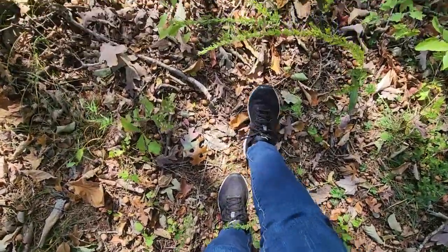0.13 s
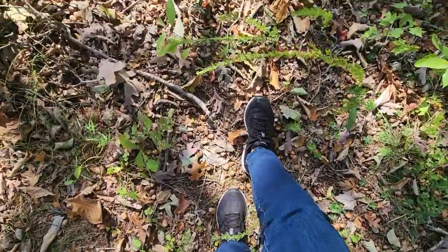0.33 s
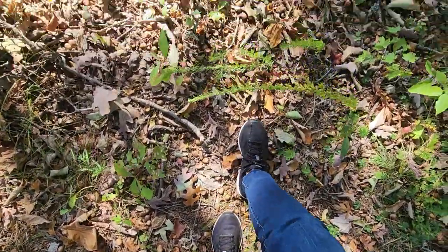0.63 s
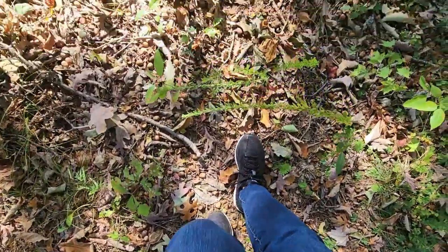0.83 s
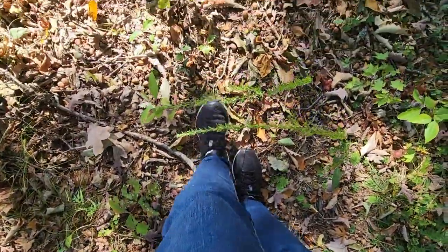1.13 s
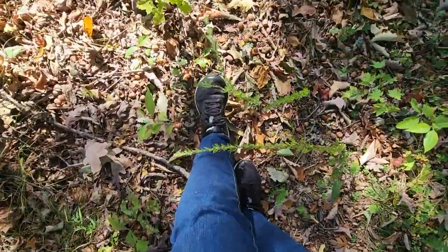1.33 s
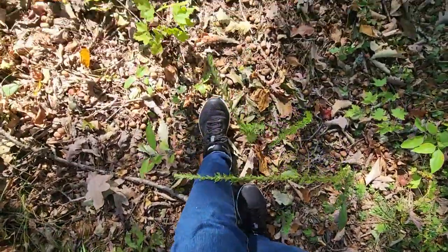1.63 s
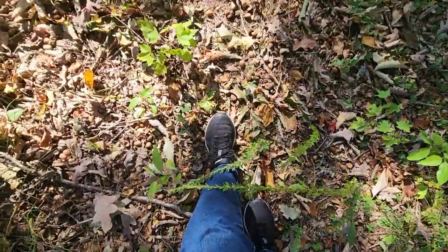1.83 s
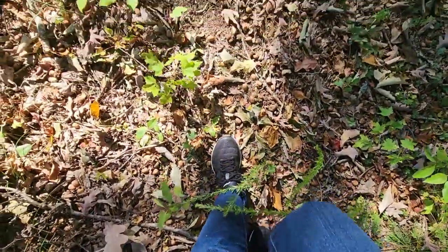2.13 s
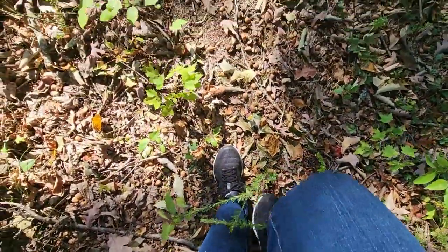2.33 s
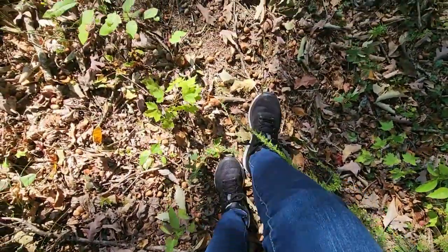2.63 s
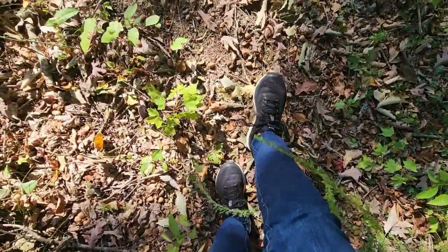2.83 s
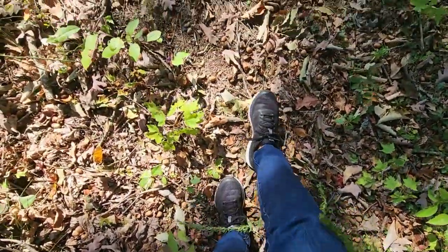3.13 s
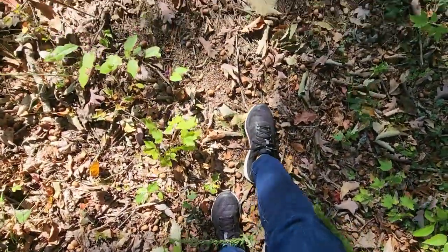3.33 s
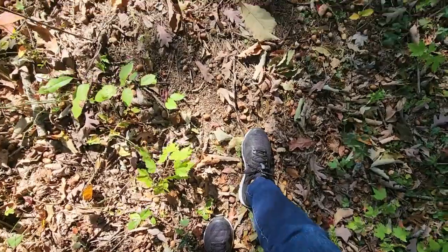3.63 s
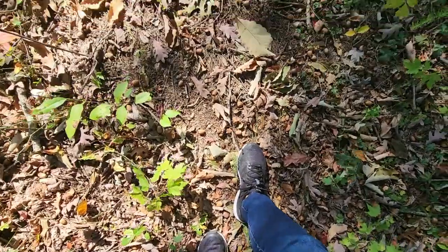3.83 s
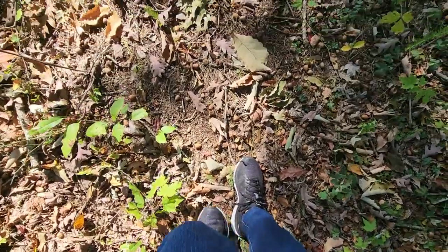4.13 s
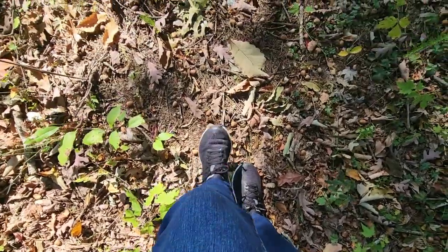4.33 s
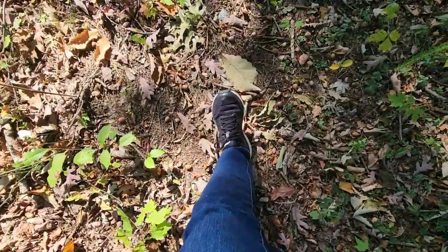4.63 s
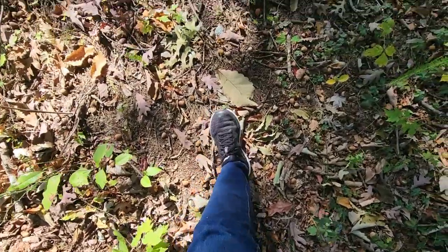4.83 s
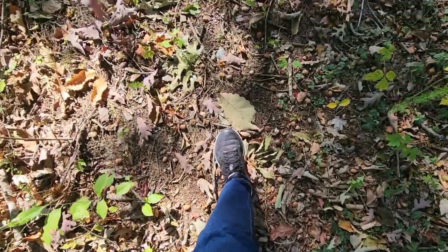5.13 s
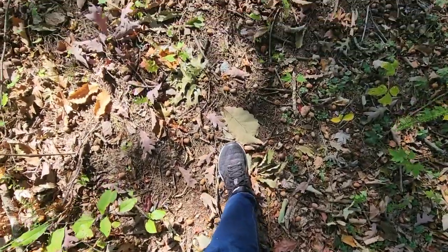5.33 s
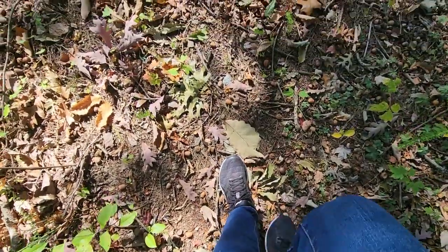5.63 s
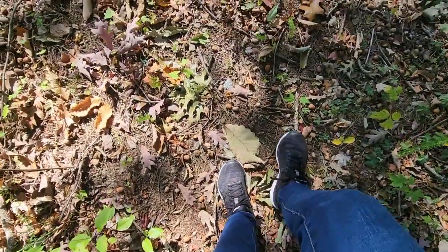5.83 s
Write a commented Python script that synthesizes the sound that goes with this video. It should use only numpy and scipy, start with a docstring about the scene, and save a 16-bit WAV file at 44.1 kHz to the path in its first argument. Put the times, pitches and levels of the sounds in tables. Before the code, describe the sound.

Someone in sneakers walks slowly on leaf litter outdoors, each step a crisp crackling burst that thins out before the next.

```python
"""Dry leaves and twigs crack and crackle under slow footsteps on a forest floor.
Each crack is a burst of noise, mostly a millisecond or two long. Loud ones are listed one by one;
thousands of small ones follow the weight on the foot. A few dull thuds and soft scrapes join them.
A low rumble, light wind and a faint hush lie underneath. The camera body cuts a deep notch in the cracks."""
import sys
import numpy as np
from scipy import signal
from scipy.fft import rfft, irfft
from scipy.io import wavfile
from scipy.ndimage import uniform_filter1d

SR = 44100
rng = np.random.default_rng(int(sys.argv[2]) if len(sys.argv) > 2 else 0)


def waveform_to_disk(signal):
    """Save audio, clipped to [-1, 1], as 16-bit WAV at the path in sys.argv[1]."""
    frames = np.transpose(np.atleast_2d(signal))
    scaled = np.clip(frames, -1, 1) * 32767
    samples = np.round(scaled).astype(np.int16)
    wavfile.write(sys.argv[1], SR, samples)


N = 263277  # length of the scene in samples
EDGE_HZ = 15760  # nothing is kept above about this pitch
SIZE, LEAD = 1024, 128  # samples in a burst, and samples before its listed moment
HZ = np.fft.rfftfreq(SIZE, 1 / SR)

# Loud cracks of twigs and stiff leaves. Each row: moment in seconds, body pitch in Hz, body level in dB,
# crisp level (about 3-6 kHz) in dB, fizz level (about 7 kHz up) in dB, left-right tilt in dB, decay in ms.
# The levels give the energy of both channels together, as if spread over 1 ms.
LOUD_CRACKS = [(0.0549, 1400, -38, -30, -38, 1, 0.35), (0.14, 1570, -45, -47, -22, 0, 1.2),
               (0.198, 1370, -35, -32, -39, 2, 0.85), (0.2043, 1550, -37, -27, -43, -2, 0.32),
               (0.2137, 855, -34, -34, -44, -2, 0.24), (0.244, 1880, -53, -28.5, -41, -6, 0.57),
               (0.2682, 2060, -27, -24, -37, -1, 0.85), (0.2747, 2240, -24, -22, -32, -5, 0.2),
               (0.2794, 770, -24.5, -20, -37, 1, 0.21), (0.288, 2010, -40, -21, -30, 3, 0.84),
               (0.3017, 2140, -33, -27, -26, 1, 1.6), (0.317, 1640, -42, -36, -20, 6, 0.42),
               (0.342, 1410, -39, -30, -18.5, 1, 0.74), (0.3722, 740, -55, -36, -11.5, -2, 0.49),
               (0.4038, 1130, -15.5, -20.5, -19.5, -1, 0.35), (0.4943, 1970, -61, -39, -38, 1, 0.39),
               (0.5134, 950, -37, -29, -52, -4, 0.16), (0.5199, 1890, -31.5, -33, -48, -2, 0.29),
               (0.6018, 1460, -42.5, -38, -47, -1, 0.79), (0.654, 1240, -35, -38, -46.5, 1, 0.3),
               (0.6631, 1920, -71, -51, -31, -4, 0.3), (0.773, 2030, -39.5, -49, -52, -3, 0.56),
               (0.7995, 1750, -36, -52, -34, 4, 0.33), (0.8177, 990, -28.5, -31.5, -36, 5, 0.31),
               (0.8468, 1840, -59, -44, -30, 0, 0.53), (1.0128, 2020, -37, -40, -37, -1, 4.2),
               (1.1107, 1390, -28, -30, -47, -1, 0.81), (1.1303, 1410, -25.5, -30, -30, -7, 3.5),
               (1.139, 1500, -34, -32, -27, 4, 0.83), (1.1696, 1790, -37, -34, -45, -6, 0.21),
               (1.156, 1600, -36, -40, -36, -4, 0.6), (1.191, 1850, -45, -32, -51, 0, 0.46),
               (1.3393, 2100, -41, -33, -39, 1, 0.5), (1.367, 2220, -60, -37, -48, 0, 0.4),
               (1.3872, 2240, -29.5, -28, -22, 10, 1.3), (1.3918, 1060, -32.5, -23, -24, -2, 0.78),
               (1.447, 1310, -47, -31, -22, -1, 0.28), (1.457, 1400, -37, -25, -22, 5, 0.61),
               (1.4643, 1360, -53, -26.5, -21, 9, 0.62), (1.4986, 1340, -55, -31, -18.5, 0, 0.39),
               (1.5077, 770, -41, -35, -30, 1, 1), (1.5736, 1780, -26, -22, -33, -3, 0.25),
               (1.6398, 1460, -60, -49, -17.5, 0, 0.3), (1.6565, 1440, -25.5, -20.5, -18, -2, 4.7),
               (1.7142, 704, -28.5, -52, -26, -1, 1.8), (1.769, 716, -32.5, -32.5, -43, -5, 0.62),
               (1.821, 1610, -49, -29, -25, -1, 0.57), (1.8416, 1360, -63, -60, -24, -7, 0.3),
               (1.8528, 1720, -33.5, -52, -50, 3, 0.37), (1.8824, 795, -25.5, -32.5, -26, 2, 0.24),
               (1.9542, 1900, -33, -25.5, -23, -0.5, 1.1), (2.0044, 1880, -45, -29.5, -51, -6, 0.63),
               (2.0106, 1540, -35.5, -31, -41, 0, 0.47), (2.0424, 890, -57, -34, -30, 0, 0.5),
               (2.0923, 1390, -31, -36, -30, 0, 1.3), (2.1863, 1810, -30, -22.5, -33, -1, 0.22),
               (2.255, 1900, -65, -55, -44, 5, 0.4), (2.2943, 1960, -65, -54, -39, 17, 0.34),
               (2.4646, 1970, -46, -45, -38, 18, 0.26), (2.5064, 1370, -42, -74, -39, 9, 0.33),
               (2.5301, 2210, -50, -59, -39, 8, 0.99), (2.6914, 2180, -42, -50, -34, 11, 5.3),
               (2.97, 1800, -58, -56, -30, -20, 0.28), (3.003, 2130, -31.5, -30, -24, 2, 0.79),
               (3.0143, 1490, -49, -50, -29, -3, 0.88), (3.043, 1890, -54, -32, -24, -2, 0.32),
               (3.075, 1430, -25, -25, -26, -4, 0.4), (3.089, 885, -30.5, -45, -20, -1, 0.57),
               (3.132, 1240, -39, -33, -27, 0, 0.79), (3.2518, 1620, -36, -46, -53, 0, 0.22),
               (3.295, 990, -43, -48, -25, 0, 0.46), (3.308, 1890, -51, -47, -24, 6, 0.37),
               (3.3147, 1660, -37, -27.5, -23, 1, 1.5), (3.3276, 1430, -32, -45, -47, -1, 0.51),
               (3.3562, 417, -52, -54, -18, 4, 1), (3.3671, 1470, -24.5, -26, -20, -4, 0.59),
               (3.3744, 523, -32, -27.5, -20, -1, 2.1), (3.3825, 730, -28.5, -40, -33, 3, 0.21),
               (3.4594, 2200, -45, -34, -24, 5, 0.47), (3.5522, 1480, -46, -48, -23, -3, 0.37),
               (3.602, 1800, -31.5, -44, -59, -2, 0.29), (3.6993, 844, -38, -38, -53, -1, 0.32),
               (3.957, 1930, -33.5, -38, -40, -1, 0.23), (4.1279, 1270, -38.5, -47, -36, 1, 0.45),
               (4.201, 1850, -38.5, -60, -49, -1, 0.81), (4.273, 2440, -56, -36, -42, 8, 0.28),
               (4.3204, 1240, -42, -35, -36.5, -5, 0.16), (4.3418, 790, -55, -50, -39, -5, 0.4),
               (4.3764, 1670, -48, -55, -39, -9, 0.49), (4.406, 2150, -47, -43, -53, -4, 0.62),
               (4.44, 2060, -40, -58, -49, -4, 0.75), (4.5597, 1620, -47, -41.5, -56, -3, 0.43),
               (4.641, 1080, -39.5, -43, -54, 0, 0.5), (4.7597, 980, -49, -35, -26, -5, 0.7),
               (4.9179, 2050, -34.5, -34, -27, -4, 0.68), (4.9313, 1210, -57, -39, -26, -7, 0.6),
               (4.9854, 1360, -30.5, -48, -39, -3, 0.45), (5.0535, 2000, -36, -34.5, -37, 0, 0.38),
               (5.0991, 1770, -32.5, -30, -26.5, -1, 0.51), (5.1206, 660, -25.5, -34, -50, -1, 0.3),
               (5.1312, 1170, -42, -26.5, -24, 0, 0.98), (5.149, 1290, -28.5, -35, -24, -1, 0.37),
               (5.181, 1390, -40, -39, -30, -3, 0.3), (5.2045, 1580, -29, -30, -33, -0.5, 0.23),
               (5.2305, 2110, -29, -25.5, -24, -1, 0.31), (5.2507, 810, -38, -29, -32, -1, 0.42),
               (5.296, 855, -35.5, -30, -22, 2, 1.7), (5.3032, 1800, -33.5, -46, -13, -2, 0.85),
               (5.374, 2060, -28.5, -33.5, -34, -2, 0.8), (5.423, 1180, -35, -24, -40, -1, 0.28),
               (5.4324, 1520, -45, -33, -29, -4, 0.65), (5.4379, 1600, -52, -32, -20.5, 3, 0.36),
               (5.4708, 2200, -55, -42, -32, -4, 0.4), (5.478, 1690, -38, -53, -36, -5, 0.49),
               (5.492, 1610, -20.5, -20, -32, 0.5, 0.64), (5.555, 950, -56, -44, -36, 0, 0.34),
               (5.9547, 840, -23.5, -36, -30, 5, 1.3)]


def cracks():
    """Twigs and stiff leaves snap loudly: one burst per row, with a clean jolt in it."""
    moment_s, *traits = np.transpose(LOUD_CRACKS)
    return placed(moment_s, fractures(*traits, body_q=3.5, snap=1.0, lumps_db=1.8))


CLUMP_S = 0.012  # one leaf keeps splitting for about this long
# Body and fizz of small fractures in dB over their crisp part, when the load is LIGHT_DB.
BODY_DB, FIZZ_DB, LIGHT_DB = -1, 6.5, -40
BODY_PER_DB, FIZZ_PER_DB = -0.004, 0.13  # change per dB of load: light loads sound rounder


def crackle(count, size, spread_db, decay_ms, tint_db, level_db):
    """Leaves split in many small fractures, `size` to a leaf, as loud as the load on the litter."""
    when, pitch, rarity, delay = rng.random((count, 4)).T
    normal = rng.standard_normal((count, 5)).T
    leaf = np.arange(count) // size * size  # fractures of one leaf share moment, pitch, colour and side
    moment_s = when[leaf] * N / SR - CLUMP_S * np.log(delay + 1e-9)
    moment_s = np.minimum(moment_s, N / SR)
    load_db = litter_load(moment_s)
    tint = tint_db * normal[:3, leaf]
    body_db = BODY_DB + BODY_PER_DB * (load_db - LIGHT_DB) + tint[0]
    fizz_db = FIZZ_DB + FIZZ_PER_DB * (load_db - LIGHT_DB) + tint[2]
    body_hz = 470 * 5.03 ** pitch[leaf]
    pan_db = 7.3 * normal[3][leaf]
    decays_ms = decay_ms * np.exp(0.77 * normal[4])
    bursts = fractures(body_hz, body_db, tint[1], fizz_db, pan_db, decays_ms,
                       body_q=1.93, snap=0.56, lumps_db=2.5)
    # Strong ones are rare, and capped: the largest are in the table of loud cracks.
    strength = gain_of(spread_db * np.minimum(-np.log(rarity + 1e-9), 3.0))
    scale = np.sqrt(np.mean(strength ** 2 * (bursts ** 2).sum(axis=-1)) * count / N)
    gain = strength * gain_of(load_db + level_db) / scale
    return placed(moment_s, bursts * gain[:, None])


# Weight on the leaf litter, swelling as each foot rolls and easing as it lifts.
# Each row: moment in seconds, load in dB (each crackle layer adds its own level).
FOOT_WEIGHT = [(0.0, -35), (0.15, -39.5), (0.28, -30.5), (0.42, -41.5), (0.6, -47), (0.8, -46), (0.87, -56),
               (1.05, -59.5), (1.27, -54), (1.43, -36), (1.55, -39.5), (1.7, -37.5), (1.85, -42.5),
               (2.18, -40), (2.22, -55), (2.4, -56.5), (2.65, -56.5), (2.8, -52), (2.93, -44.5),
               (3.06, -34.5), (3.2, -44.5), (3.36, -37.5), (3.55, -45), (3.87, -43.5), (3.96, -38),
               (4.1, -49.5), (4.3, -53), (4.6, -53), (4.78, -42), (4.95, -36), (5.05, -40.5), (5.25, -40),
               (5.48, -41.5), (5.6, -51), (5.76, -67), (5.86, -68), (5.97, -65)]
# A swinging shoe brushes loose leaves. Each row: start in seconds, length in seconds, load in dB.
SHOE_BRUSHES = [(1.086, .07, -40), (2.683, .04, -47.5), (5.875, .12, -45)]
BRUSH_RISE_S, BRUSH_FADE_DB_PER_S = 0.0013, 321


def litter_load(s):
    """Load on the leaves in dB: the powers of the foot's weight and of the brushes add up."""
    start, length, db = np.transpose(SHOE_BRUSHES)[:, :, None]
    rise_db = 30 * np.minimum((s - start) / BRUSH_RISE_S - 1, 0)
    fade_db = BRUSH_FADE_DB_PER_S * np.maximum(s - start - length, 0)
    weight_power = gain_of(2 * np.interp(s, *np.transpose(FOOT_WEIGHT)))
    brush_power = gain_of(2 * (db + rise_db - fade_db)).sum(axis=0)
    return 10 * np.log10(weight_power + brush_power)


# How the camera body colours the cracks. Each row: pitch in Hz, relative level in dB per Hz.
CAMERA_BODY = [(150, -18), (300, 8.5), (480, 1), (1030, 2.5), (1440, 2), (2300, -5), (2800, -18.5),
               (3300, -11.5), (4000, -6), (4800, -4), (6350, -13.5), (7500, -7.5), (9700, -10), (11000, -9),
               (13200, -8), (15000, -3.5)]


def fractures(body_hz, body_db, crisp_db, fizz_db, pan_db, decay_ms, body_q, snap, lumps_db, rise_share=2.07):
    """Fibres part in a burst of noise: a damped body ring, a crisp middle and a fizz for each fracture."""
    t = (np.arange(SIZE // 2) - LEAD) / SR * 1000 / np.clip(decay_ms, .15, 4)[:, None]  # in decay times
    shape = 1 / (np.exp(-2 * t / rise_share) + np.exp(t))  # the fibre gives way, parts, and settles
    draws = rng.standard_normal((len(t), 3, SIZE // 2))
    rough_noise = draws[:, :2] * gain_of(1.13 * draws[:, 2:])
    spectra = evened(rfft(shape[:, None] * rough_noise, SIZE))
    # One clean jolt as the fibre parts.
    jolt = snap * np.sign(draws[:, 0, :1]) * np.exp(-2j * np.pi * HZ * LEAD / SR)
    # Every fracture has its own colour: six random waves along the pitch scale.
    waves = np.cos(np.pi * np.arange(1, 7)[:, None] * HZ / EDGE_HZ)
    lumps = gain_of(lumps_db * draws[:, 2, :len(waves)] @ waves)
    tilt = gain_of(np.array([pan_db, -pan_db]) / 2)[:, :, None]
    path = causal(read(CAMERA_BODY, HZ)) * tilt
    splinters = paired(spectra[:, 0], spectra[:, 1], HZ) * path * lumps
    jolted = paired(spectra[:, 0] + jolt, spectra[:, 1], HZ) * path
    u = (HZ + 1) / body_hz[:, None]
    ring = -u ** 2 / (1 - u ** 2 + 1j * u / body_q)
    # Smooth shares of the power above 2800 Hz and above 6500 Hz.
    upper = 1 / (1 + (2800 / (HZ + 1)) ** 8)
    top = 1 / (1 + (6500 / (HZ + 1)) ** 8)
    body = jolted * ring * np.sqrt(1 - upper)
    crisp = splinters * np.sqrt(upper - top)
    fizz = splinters * np.sqrt(top)
    total = 0
    for db, part in ((body_db, body), (crisp_db, crisp), (fizz_db, fizz)):
        energy = (abs(part) ** 2).sum(axis=(0, 2)) / SIZE
        total = total + part * (gain_of(db) * np.sqrt(SR / 1000 / energy))[:, None]
    return irfft(total, SIZE)


def placed(s, bursts):
    """Add the bursts into the two channels at their moments in seconds."""
    at = (np.round(s * SR).astype(int)[:, None] + np.arange(SIZE)).ravel()
    return np.array([np.bincount(at, b.ravel(), N + 2 * SIZE)[LEAD:][:N] for b in bursts])


def litter_tail(x, t60):
    """Nearby ground and legs scatter the cracks: a short sparse tail, alike on both sides in the bass."""
    t = np.arange(4 * SIZE) / SR
    noise = rng.standard_normal((2, len(t)))
    sparse = rng.random((2, len(t))) < .15
    taps = noise * sparse * gain_of(-60 * t / t60) * (t > .0015)
    hz = np.fft.rfftfreq(len(t), 1 / SR)
    undo_lean = gain_of(np.outer([.5, -.5], read(SIDE_LEAN, hz)))  # x already leans to one side
    taps = irfft(paired(*rfft(taps), hz) / undo_lean)
    return signal.oaconvolve(x, taps / np.linalg.norm(taps, axis=1, keepdims=True), axes=1)[:, :N]


# The sole meets soil or a thick twig.
# Each row: moment in seconds, level in dB from which the knock dies away, pitch in Hz.
SOLE_THUDS = [(0.209, -44, 328), (1.088, -41, 346), (1.456, -39, 293), (3.367, -28, 380), (5.115, -55, 422)]


def thuds(t60=0.024):
    """The sole knocks dully: a quickly damped sine wave, the same on both sides."""
    s, start_db, hz = np.transpose(SOLE_THUDS)[:, :, None]
    t = np.maximum(np.arange(SIZE) - LEAD, 0) / SR
    attack = 1 - np.exp(-t / 0.000099)
    knock = gain_of(start_db - 60 * t / t60) * np.sin(2 * np.pi * hz * t) * attack
    return placed(s[:, 0], [knock, knock])


# The sole drags over leaves and soil.
# Each row: start in seconds, length in seconds, pitch in Hz, level in dB at the height of the swell.
SOLE_SCRAPES = [(2.781, 0.076, 1320, -59), (4.12, 0.056, 1380, -56), (4.467, 0.088, 1390, -53),
                (5.682, 0.04, 1340, -64), (5.89, .08, 645, -55)]
SCRAPE_Q, SCRAPE_ROUGH_DB = 4.7, 4.5  # sharpness of the resonance, and random unevenness


def scrapes():
    """The sole rubs: rough noise through one broad resonance, swelling and fading."""
    out = np.zeros(N)
    for start, length, hz, db in SOLE_SCRAPES:
        n = round(length * SR)
        noise, grit = rng.standard_normal((2, 4 * SIZE + SIZE // 2))[:, :n]
        grit = evened(uniform_filter1d(grit, size=150))
        rough_noise = noise * gain_of(SCRAPE_ROUGH_DB * grit)
        rub = signal.lfilter(*signal.iirpeak(hz, SCRAPE_Q, SR), rough_noise)
        swell = np.sin(np.linspace(0, np.pi, len(rub)))
        out[round(start * SR):][:len(rub)] += gain_of(db) * evened(rub) * swell
    return out


# Colour of the low rumble. Each row: pitch in Hz, relative level in dB per Hz.
RUMBLE_SPECTRUM = [(12, -17), (20, -12.5), (53, 2), (81, 0), (141, -8), (195, -16.5), (248, -18.5),
                   (329, -18), (500, -33), (650, -57), (1100, -120)]
RUMBLE_DB, SWELL_DB = -50, 1.0
# Colour of one low buffet of wind. Each row: pitch in Hz, relative level in dB per Hz.
GUST_SPECTRUM = [(15, -12), (45, -2), (90, -5), (140, -12), (220, -33), (600, -100)]
GUST_S, GUST_RISE_S, GUST_FADE_S = 5.09, .09, .08  # height of the buffet, its rise and its fade
GUST_DB = -35.5  # at its height


def wind():
    """Low rumbling noise swells at random under slow sine waves, with one deeper buffet."""
    t = np.arange(N) / SR
    slow_hz = np.geomspace(.5, 12, 20)
    swell = evened(sum(np.sin(2 * np.pi * (f * t + rng.random())) / np.sqrt(f) for f in slow_hz))
    width_s = np.where(t < GUST_S, GUST_RISE_S, GUST_FADE_S)
    gust = gain_of(GUST_DB) * np.exp(-((t - GUST_S) / width_s) ** 2)
    rumble = hush(RUMBLE_SPECTRUM, size=4096, patchy_db=1.0) * gain_of(RUMBLE_DB + SWELL_DB * swell)
    return rumble + gust * hush(GUST_SPECTRUM, size=4096, patchy_db=2.5)


# Colour of the faint hush of the wood. Each row: pitch in Hz, relative level in dB per Hz.
WOOD_HUSH = [(400, -69), (650, 14), (1000, -5.5), (2000, -15), (2900, -29), (4500, -53), (6500, -23),
             (8500, -3), (10500, -19), (15700, -20)]


def air():
    """The wood hushes faintly: steady, slightly patchy noise at -66 dB."""
    return gain_of(-66) * hush(WOOD_HUSH, size=512, patchy_db=3.5)


def hush(colour, size, patchy_db):
    """Noise built from random short spectra whose level drifts in patches; overall rms 1."""
    frames, hz = 4 * N // size + 5, np.fft.rfftfreq(size, 1 / SR)
    a, b, c, d, patches = np.moveaxis(rng.standard_normal((frames, len(hz), 5)), -1, 0)
    patches = uniform_filter1d(uniform_filter1d(patches, size=5, axis=0), size=5, axis=1)
    level_db = read(colour, hz) + patchy_db * patches / patches.std()
    z = paired(a + 1j * b, c + 1j * d, hz) * gain_of(level_db)
    x = signal.istft(z.transpose(0, 2, 1), nperseg=size, noverlap=3 * size // 4)[1][:, :N]
    return x / x.std()


# Left microphone over the right one. Each row: pitch in Hz, level difference in dB.
SIDE_LEAN = [(100, 2.8), (300, 1), (1500, 1.5), (2700, 3), (3400, -2), (4800, -3), (6200, 4), (7500, 1),
             (9000, 0), (11000, 2), (12300, -3), (14500, 5)]
# How alike the two sides are. Each row: pitch in Hz, likeness from 0 (unrelated) to 1 (the same).
SIDE_LIKENESS = [(100, .84), (300, .86), (600, .96), (1200, .96), (2200, .82), (2800, .1), (4200, .6),
                 (6000, .1), (8000, .3), (9600, .1), (11000, .2), (15000, 0)]


def paired(left, other, hz):
    """Two microphones hear spectra that are alike in the bass and mostly unlike in the treble."""
    same = np.clip(read(SIDE_LIKENESS, hz), -1, 1)
    lean = gain_of(read(SIDE_LEAN, hz) / 2)
    right = same * left + np.sqrt(1 - same ** 2) * other
    return np.array([left * lean, right / lean])


def causal(db):
    """Minimum-phase response for a gain curve in dB: it acts as early as it can, never ahead of time."""
    log_gain = np.log(gain_of(np.maximum(db, -100)))
    circle = np.concatenate([log_gain, log_gain[-2:0:-1]])
    return np.exp(np.conj(signal.hilbert(circle)))[:len(db)]


def read(points, hz):
    """Read a curve of (pitch, value) rows at any pitch, along a logarithmic pitch scale."""
    f, value = np.transpose(points)
    return np.interp(np.log(hz + 1), np.log(f + 1), value)


def gain_of(db):
    """Turn dB into a factor for the wave's height."""
    return 10 ** (np.asarray(db) / 20)


def evened(x):
    """Scale to rms 1 along the last axis."""
    return x / np.sqrt(np.mean(abs(x) ** 2, axis=-1, keepdims=True) + 1e-20)


def scene():
    """Sum the cracks and crackle, their scatter, the thuds, scrapes, wind and hush."""
    crunch = cracks()
    crunch += crackle(count=1200, size=3, spread_db=2.0, decay_ms=0.87, tint_db=6.0, level_db=-3.5)
    crunch += crackle(count=6000, size=1, spread_db=0.0, decay_ms=1.0, tint_db=1.5, level_db=-1.0)
    scatter = gain_of(-14) * litter_tail(crunch, t60=.04)
    return crunch + scatter + thuds() + scrapes() + wind() + air()


def record(dry):
    """The recorder's band limit: a steep low-pass filter at EDGE_HZ."""
    low_pass = signal.firwin(511, EDGE_HZ, window=("kaiser", 9), fs=SR)
    return signal.oaconvolve(dry, low_pass[None], "same")


dry = scene()
out = record(dry)
waveform_to_disk(out)
```